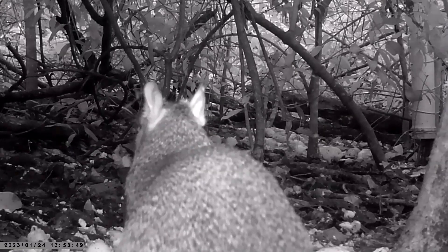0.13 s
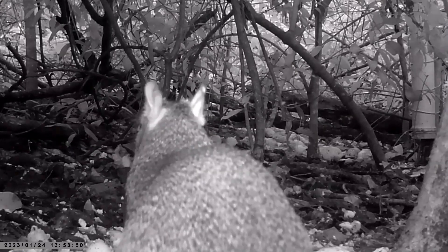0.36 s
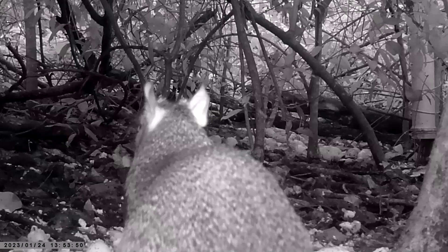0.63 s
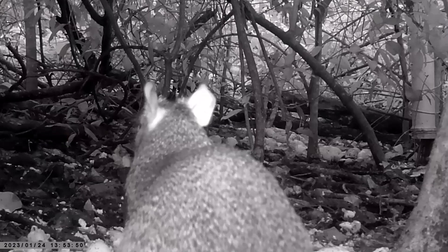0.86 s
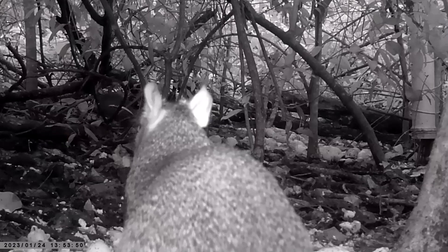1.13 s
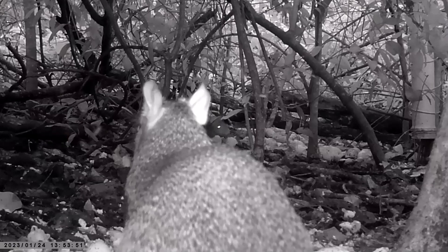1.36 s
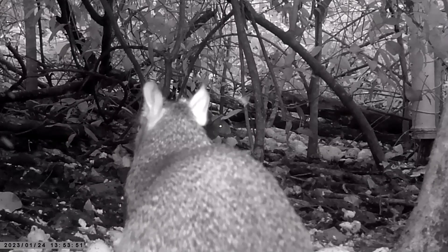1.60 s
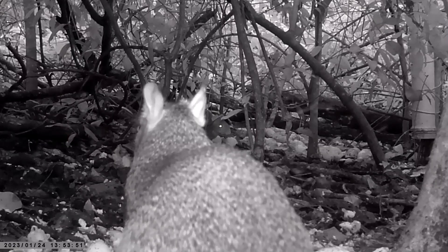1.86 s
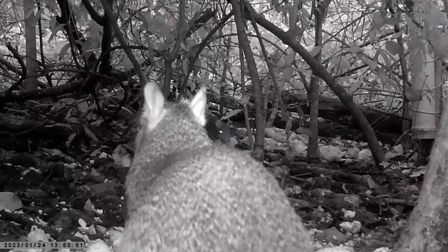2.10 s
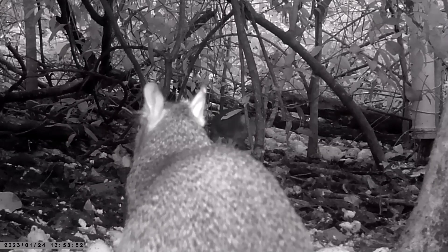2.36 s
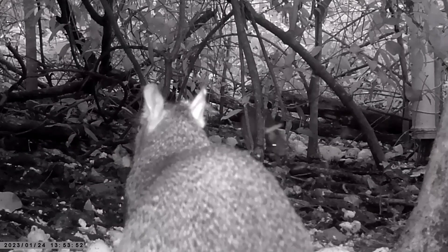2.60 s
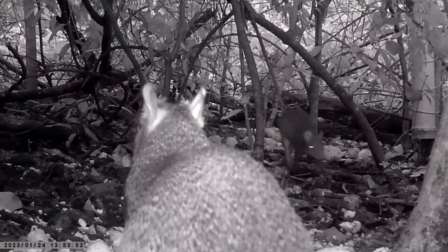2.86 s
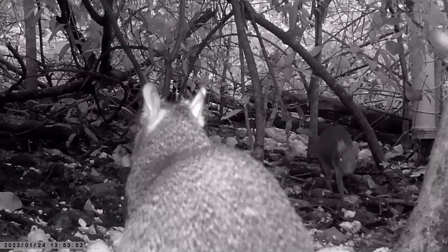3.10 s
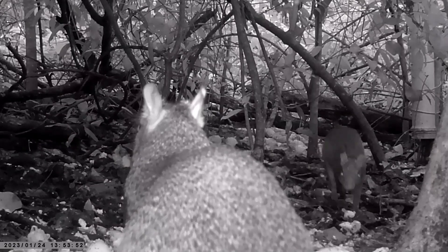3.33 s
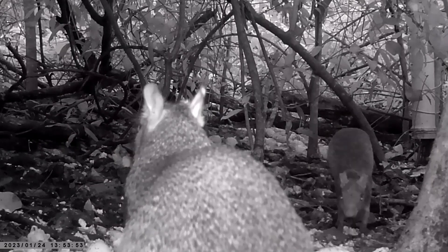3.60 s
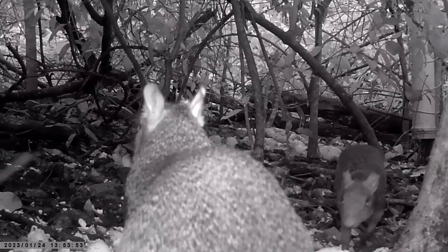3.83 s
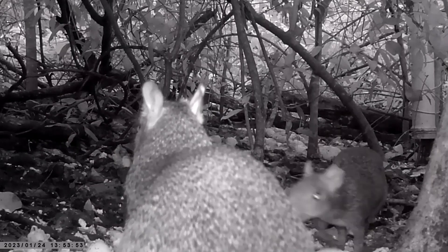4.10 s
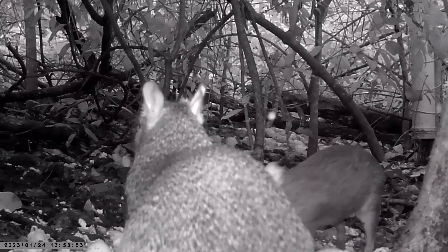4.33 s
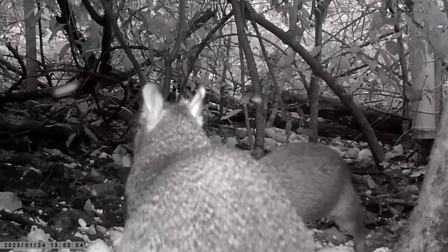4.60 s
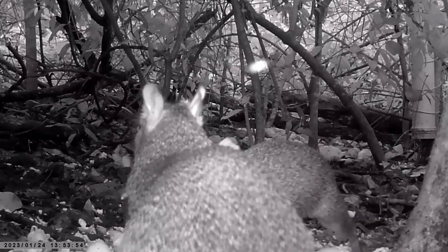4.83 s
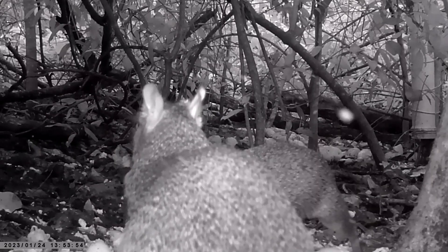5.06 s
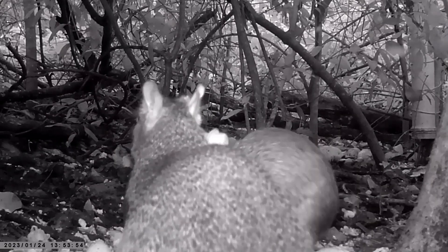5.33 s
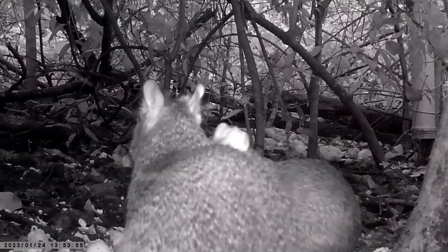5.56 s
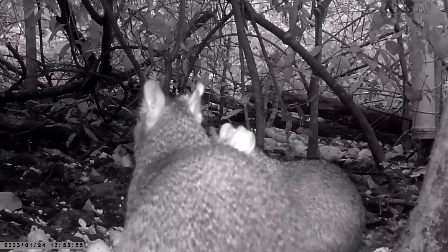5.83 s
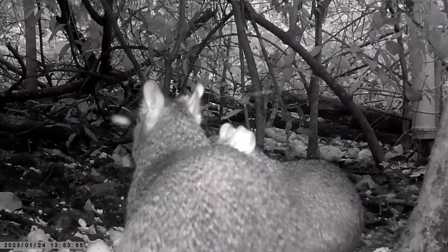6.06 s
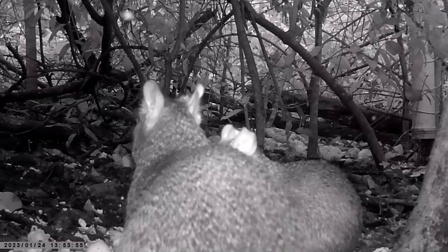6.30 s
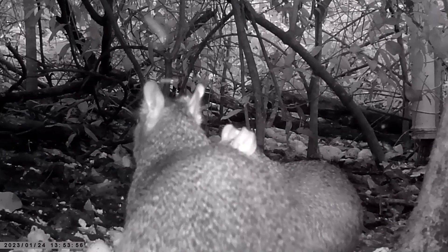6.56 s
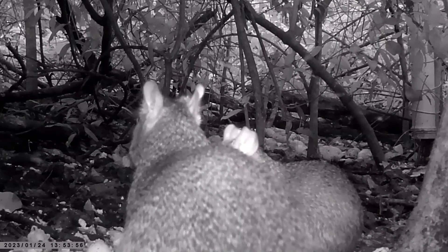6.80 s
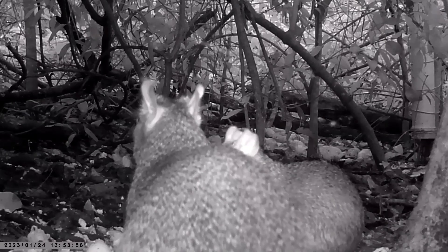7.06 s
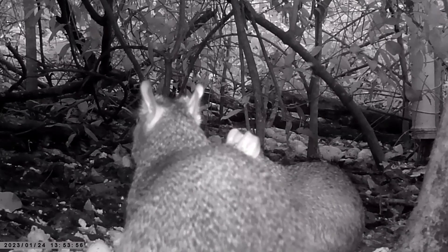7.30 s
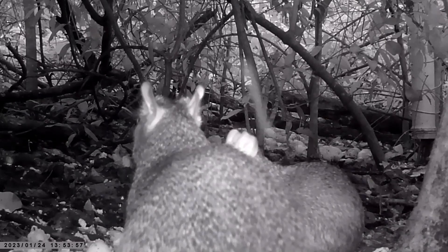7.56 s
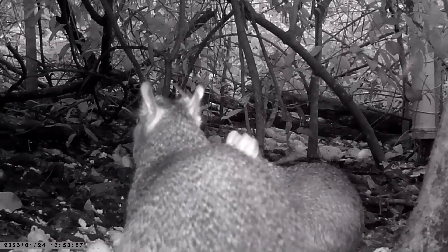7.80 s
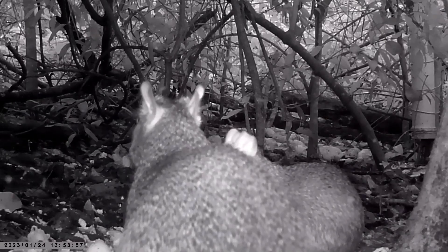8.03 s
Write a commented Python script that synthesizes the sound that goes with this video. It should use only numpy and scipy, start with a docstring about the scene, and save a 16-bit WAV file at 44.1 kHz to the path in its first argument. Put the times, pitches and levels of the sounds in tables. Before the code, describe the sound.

Daytime forest: raspy, descending bird calls repeat nearby, fainter birds hook and whistle, katydids and crickets trill, a fly hums, and leaves rustle lightly.

```python
"""A wood by day. From the start a near bird scolds with short falling calls, built of overtones and a rasp of noise;
other birds hook, whistle and slur further off, something hoots, katydids trill, and a fly hums on each pass.
From 1.3 s a cricket chirps in rows and leaves rustle; at 4.5 s a far dog barks, from 5.9 s small animals squeak.
From 6.5 s a far engine grows louder and speeds up. Noise echoes ring among the trunks; bands of noise make
the insect chorus, the rumble, a low hum, a wash of far sound and the hiss of a small microphone throughout."""
import sys
import numpy as np
from scipy import signal
from scipy.fft import rfft, irfft
from scipy.io import wavfile

SR = 44100
rng = np.random.default_rng(int(sys.argv[2]) if len(sys.argv) > 2 else 0)


def master_out(mix):
    """Clip the mix to full scale and print it as 16-bit PCM to the path in sys.argv[1]."""
    frames = np.transpose(np.atleast_2d(mix))
    ceiling = np.clip(frames, -1, 1)
    pcm = np.round(ceiling * 32767).astype(np.int16)
    wavfile.write(sys.argv[1], SR, pcm)


def to_linear_factor(level_db):
    """Convert decibel levels (scalar or array-like) to linear amplitude factors."""
    exponent = np.asarray(level_db, float) / 20
    return 10 ** exponent


N = 360297   # samples in the scene


def rms_one(x):
    """Scale to an average strength (rms) of 1."""
    return x / np.sqrt(np.mean(x ** 2) + 1e-20)


def in_time(rows):
    """Turn the columns of a table into smooth curves over all samples."""
    s, *columns = np.transpose(rows)
    return [np.interp(np.arange(N) / SR, s, column) for column in columns]


def at_hz(points, hz, order=1):
    """Read one column of a table at any frequency, on a log-frequency axis."""
    points = np.array(points)
    return np.interp(np.log(hz), np.log(points[:, 0]), points[:, order])


def drift(rate):
    """Slow random wandering of rms 1: noise smoothed below about rate in Hz."""
    r = np.exp(-2 * np.pi * rate / SR)
    smooth = signal.lfilter([1], [1, -2 * r, r * r], rng.standard_normal(N + SR))
    return rms_one(smooth[SR:])   # the first second lets the filter settle


def coloured(spectrum, low_hz=0, high_hz=SR):
    """Noise of a given spectrum, silent outside it or outside the two edges; rms 1."""
    hz = np.arange(N // 2 + 1) * SR / N + 1e-3
    inside = (hz > max(spectrum[0][0], low_hz)) & (hz < min(spectrum[-1][0], high_hz))
    noise = rfft(rng.standard_normal(N))
    return rms_one(irfft(noise * to_linear_factor(at_hz(spectrum, hz)) * inside, N))


def resonance(x, hz, width_hz):
    """Something that rings at one pitch: a two-pole band with gain 1 on top."""
    r = np.exp(-np.pi * width_hz / SR)
    feedback = [1, -2 * r * np.cos(2 * np.pi * hz / SR), r * r]
    return signal.lfilter(np.array([1, 0, -1]) * (1 - r * r) / 2, feedback, x)


def shaped(shape, s, level_db, first_s, second_s, top_hz, low_hz):
    """One note: a shape stretched over two parts and between two pitches; rows (s, Hz, dB)."""
    progress, height, shape_db = np.transpose(shape)
    times = s + np.interp(progress, [0, 1, 2], [0, first_s, first_s + second_s])
    return np.transpose([times, low_hz + height * (top_hz - low_hz), level_db + shape_db])


def swells(rows, sag):
    """Plain notes whose pitch rises and sinks; sag is the share of the top pitch that they span."""
    # shape of a plain note: (progress [0-2], height [0-1], relative level [dB])
    swell = [(0, 0, -2), (.6, 0.77, 0), (1.3, 1, 0.5), (2, .1, 5)]
    return [shaped(swell, s, db, length / 2, length / 2, top, top * (1 - sag)) for s, db, length, top in rows]


def voice(notes, throat, waver, flutter_db, count, tilt_db=0):
    """Notes as stacks of overtones weighted by the throat; pitch and level tremble."""
    out = np.zeros(N + SR)   # starts one second early, so that a call under way has its echoes
    shake, flutter = drift(200), drift(160)
    for note in notes:
        s, pitch_hz, level_db = np.transpose(note)
        at = np.arange(round(s[0] * SR), min(round(s[-1] * SR), N))
        hz = np.interp(at / SR, s, pitch_hz)
        trembling_hz = hz * (1 + waver * (hz / hz.max()) ** 2 * shake[at])   # least steady at the top
        phase = 2 * np.pi * np.cumsum(trembling_hz) / SR
        stack = 0
        for k in range(1, count + 1):
            overtone_db = at_hz(throat, k * hz) - tilt_db * max(k - 2, 0)   # the tilt starts above the second
            stack = stack + to_linear_factor(overtone_db) * np.sin(k * phase)
        level = to_linear_factor(np.interp(at / SR, s, level_db) + flutter_db * flutter[at])
        out[at + SR] += stack * level * signal.windows.tukey(len(at), .14)   # soft ends
    return out


def puff(out, s, level_db, hz, length_s, width, rise_s):
    """Add a short burst of noise round a centre pitch, with a quick rise and a fading end."""
    at = np.arange(round(s * SR), round((s + 3 * length_s) * SR))
    t = (at - at[0]) / SR
    band = signal.butter(2, [hz / width, min(hz * width, .45 * SR)], "band", fs=SR)
    noise = rms_one(signal.lfilter(*band, rng.standard_normal(len(at))))
    burst = noise * np.minimum(t / rise_s, 1) * np.exp(-t / length_s)
    return out + np.bincount(at + SR, burst * to_linear_factor(level_db), len(out))


def wood(x, direct_db, echo_db, build_s):
    """Scatter from trunks and leaves: a noisy tail that builds up, then dies band by band."""
    # echoes of the wood; long waves pass round the trunks:
    # (frequency [Hz], time to die by 60 dB [s], relative strength [dB])
    scatter = [(1000, 0.57, -15), (2000, 0.33, -0.5), (2770, 0.45, -.5), (4270, 0.41, 3), (7150, 0.46, 0.5),
               (12300, 0.83, -2)]
    t, tail = np.arange(SR) / SR, 0
    edges = 500 * 2 ** np.arange(0, 5.1, .5)   # half-octave bands
    for low, high in zip(edges, edges[1:]):
        sos = signal.butter(2, [low, high], "band", fs=SR, output="sos")
        band = signal.sosfilt(sos, rng.standard_normal(SR))
        centre_hz = np.sqrt(low * high)
        tail = tail + band * to_linear_factor(at_hz(scatter, centre_hz, order=2) - 60 * t / at_hz(scatter, centre_hz))
    tail = tail * (1 - np.exp(-t / build_s))
    echoes = signal.fftconvolve(x, tail / np.sqrt(np.sum(tail ** 2)))[:len(x)]
    return (to_linear_factor(direct_db) * x + to_linear_factor(echo_db) * echoes)[SR:]   # drop the early second


def scolding_bird():
    """Hoarse calls of one shape, held then falling; the beak rasps open just before each."""
    # calls: (time [s], base level [dB], held part [s], falling part [s], upper pitch [Hz], lead of the rasp [s])
    scolds = [(-.035, -27.5, 0.047, 0.05, 2130, 0.026), (0.297, -27, 0.046, 0.051, 2326, 0.03),
              (.637, -26.5, .056, 0.042, 2285, 0.03), (1.056, -27, 0.052, .06, 2330, 0.021),
              (1.527, -26.5, 0.046, 0.049, 2327, 0.018), (1.889, -27.5, 0.043, 0.054, 2275, .025),
              (2.223, -28.5, 0.041, 0.043, 2191, .023), (2.569, -28.5, 0.045, 0.039, 2208, 0.03),
              (2.866, -28, 0.05, 0.041, 2273, .022), (3.171, -28, 0.046, 0.052, 2312, 0.025),
              (3.513, -28.5, .045, .045, 2125, 0.021), (3.86, -26.5, 0.035, .045, 2310, 0.038),
              (5.152, -27.5, 0.028, 0.051, 2384, .035), (5.541, -27, .036, 0.04, 2195, 0.034),
              (6.836, -30.5, 0.039, 0.046, 2296, 0.032), (7.271, -28.5, 0.036, 0.058, 2300, 0.037)]
    # shape of a call: (progress [0-1 held, 1-2 falling], height from end to upper pitch [0-1], relative level [dB])
    scold_shape = [(0, 0.768, 17), (.12, .82, -9.5), (.35, 0.96, -1), (0.598, .74, -1.5),
                   (1.001, .62, -7.5), (1.35, .28, -2), (1.601, .2, -5.5), (1.88, 0.043, -8.5), (2, 0, 19)]
    # what throat and beak pass of each overtone: (frequency [Hz], level [dB])
    throat = [(1100, -22), (1500, -15.5), (2200, -15), (2600, -10.5), (2950, -3.5), (3300, -4), (4000, 1.5),
              (4600, -0.5), (5000, -9), (5700, -2.5), (6500, -16.5), (7600, -5.5), (8600, -22.5),
              (12000, -19)]
    end_hz, rasp_db = 1232.5, -17   # the rasp is relative to the call's base level
    notes = [shaped(scold_shape, s, db, held, fall, top, end_hz) for s, db, held, fall, top, lead in scolds]
    out = voice(notes, throat, waver=.046, flutter_db=3.5, count=9, tilt_db=5)
    for s, db, *_, lead in scolds:
        out = puff(out, s - lead, db + rasp_db, 3200, .011, width=1.45, rise_s=.003)
    return wood(out, direct_db=-1.5, echo_db=0, build_s=.005)


def hooking_bird():
    """Hooked calls of a second bird: a quick rise in pitch, then a long fall."""
    # calls: (time [s], base level [dB], rising part [s], falling part [s], top pitch [Hz], end pitch [Hz])
    hooks = [(0.109, -40, 0.019, 0.12, 1916, 1208), (3.259, -38, .04, 0.1, 2068, 1823),
             (3.61, -37.5, 0.019, 0.095, 1922, 1215), (7.022, -41, .07, .08, 2007, 1760),
             (7.394, -41, 0.014, 0.099, 2000, 1152)]
    # the fall after the rise: (progress [1-2], height from end to top pitch [0-1], relative level [dB])
    fall_shape = [(1, 1, 0), (1.3, .82, -9.5), (1.7, .38, -11.5), (2, 0, -13)]
    # what the throat passes: (frequency [Hz], level [dB])
    throat = [(1100, -7), (1500, -2.5), (1900, -7.5), (2500, 8.5), (3000, 12), (3800, 4), (4500, 0),
              (5800, -14), (8000, -18.5)]
    start_share = .9   # a hook sets in at this share of its top pitch
    notes = []
    for s, db, rise, fall, top, end in hooks:
        start = (s, top * start_share, db - 4)
        notes.append(np.vstack([start, shaped(fall_shape, s, db, rise, fall, top, end)]))
    calls = voice(notes, throat, waver=.018, flutter_db=2.5, count=4)
    return wood(calls, direct_db=-4, echo_db=0, build_s=.006)


def whistling_bird():
    """Arched whistles of a third bird: the pitch rises, holds and bends down."""
    # whistles: (time [s], base level [dB], rising part [s], falling part [s], top pitch [Hz])
    arches = [(.28, -54.5, .1, 0.24, 1597), (3.791, -56, 0.13, 0.19, 1641), (7.571, -55, .17, .16, 1670)]
    # shape of an arch: (progress [0-2], height from lower to top pitch [0-1], relative level [dB])
    arch_shape = [(0, 0.02, -16), (.35, .55, -1), (.75, 1, -1.5), (1, 0.99, -1.5), (1.5, 0.98, 0),
                  (1.75, .86, -4), (2, .5, -2)]
    # what the throat passes: (frequency [Hz], level [dB])
    throat = [(1000, -12), (1650, 2), (3200, 11.5), (5000, -6), (6600, -8), (8300, -4.5), (9000, -38)]
    low_hz = 1070
    notes = [shaped(arch_shape, *row, low_hz) for row in arches]
    whistles = voice(notes, throat, waver=.005, flutter_db=2.5, count=5)
    return wood(whistles, direct_db=-4, echo_db=0, build_s=.006)


def slurring_bird():
    """Falling slurs of a far bird: more of each call comes as echo."""
    # slurs: (time [s], base level [dB], length [s], top pitch [Hz])
    slurs = [(0.923, -64.5, 0.15, 2790), (4.096, -62, 0.13, 2640), (4.362, -65, 0.18, 2740),
             (4.669, -66, 0.17, 2735), (4.998, -67.5, .16, 2740), (7.703, -61, 0.16, 2610),
             (7.958, -60.5, .18, 2774)]
    # shape of a slur: (progress [0-2], height from end to top pitch [0-1], relative level [dB])
    slur_shape = [(0, 1, -7), (.55, .68, -5), (1.4, .12, 0), (2, 0, -10)]
    # what the throat passes: (frequency [Hz], level [dB])
    throat = [(1800, 10.5), (3000, 15.5), (4000, -11), (6000, 1)]
    end_hz = 1890
    notes = [shaped(slur_shape, s, db, length / 2, length / 2, top, end_hz) for s, db, length, top in slurs]
    calls = voice(notes, throat, waver=.025, flutter_db=2.5, count=2)
    return wood(calls, direct_db=-9, echo_db=0, build_s=.006)


def katydids():
    """Each wing stroke scrapes a narrow resonance for part of the cycle."""
    # bouts of song: (time [s], length [s], level before the slow wavering [dB], pitch [Hz])
    bouts = [(.08, 1.14, -55, 6330), (1.3, .7, -61.5, 6360), (2.18, 0.67, -54, 6330),
             (3.212, 0.29, -54.5, 6310), (4.0, 0.67, -55, 6306), (6.821, 0.765, -53, 6360),
             (7.592, 0.41, -62, 6340), (7.933, 0.37, -58, 6345)]
    fade_s, strokes_per_s = 0.035, 55.6
    t, out = np.arange(N) / SR, 0
    cycle = np.cumsum(strokes_per_s * (1 + 0.025 * drift(8))) / SR
    strokes = .6 + np.clip(np.sin(2 * np.pi * cycle), 0, 1)
    wander, white = .9 * drift(25), rng.standard_normal(N)
    for s, length, level_db, hz in bouts:
        bout = np.clip(np.minimum(t - s, s + length - t) / fade_s, 0, 1)
        tone = np.sin(2 * np.pi * hz * t + wander)
        scrape = .28 * rms_one(resonance(white, hz, 100))
        out = out + to_linear_factor(level_db) * bout * rms_one(strokes * (tone + scrape))
    return out * to_linear_factor(1.5 * drift(6))


def cricket():
    """Rows of pure chirps at an even pace, blurred by the echoes."""
    # rows of chirps: (time of the first [s], number of chirps, base level [dB])
    rows = [(1.32, 3, -57.5), (2.39, 3, -56), (4.04, 4, -59), (4.806, 5, -59.5), (5.69, 4, -60),
            (6.548, 5, -57.5), (7.83, 5, -53.5)]
    pitch_hz, gap_s, chirp_s = 4752, .0737, .042   # the gap runs from start to start
    t, gate = np.arange(-SR, N) / SR, 0
    for s, chirps, level_db in rows:
        for k in range(round(chirps)):
            progress = np.clip((t - s - k * gap_s) / chirp_s, 0, 1)
            gate = gate + to_linear_factor(level_db + rng.normal(0, 0.67)) * np.sin(np.pi * progress) ** 0.73
    return wood(gate * np.sin(2 * np.pi * pitch_hz * t), direct_db=-.5, echo_db=-10, build_s=.005)


def small_animals():
    """They squeak in short stacks of overtones, close by and with little echo."""
    # squeaks: (time [s], base level [dB], length [s], top pitch [Hz])
    squeaks = [(5.938, -58.5, 0.014, 1000), (6.103, -60.5, 0.039, 861), (6.305, -62.5, 0.015, 880)]
    # what the throat passes: (frequency [Hz], level [dB])
    throat = [(850, -6), (1700, -2), (2600, 1), (3500, -1), (5000, -7), (7000, -13)]
    out = voice(swells(squeaks, sag=.05), throat, waver=.015, flutter_db=2, count=7)
    return wood(out, direct_db=0, echo_db=-9, build_s=.004)


def rustling_leaves():
    """Dry leaves crack and slide under the animals: short bursts of noise."""
    # rustles: (time [s], level before rise and fade [dB], centre [Hz], fading time [s])
    rustles = [(1.318, -46, 5000, .03), (4.335, -54, 8000, .03), (4.42, -56, 5000, .015),
               (4.509, -46, 5000, .006), (4.47, -58, 2200, .04), (4.54, -58, 1800, .03),
               (4.70, -58, 5000, .02), (5.80, -59, 2500, .02), (5.95, -57, 4500, .01),
               (6.094, -45, 8500, .003), (6.138, -54, 1200, .01), (6.142, -57, 5000, .01),
               (6.24, -60, 2800, .01), (6.315, -58, 3000, .015), (7.62, -57, 5000, .008)]
    out = np.zeros(N + SR)
    for s, level_db, hz, length_s in rustles:
        out = puff(out, s, level_db, hz, length_s, width=1.6, rise_s=.0007)
    return wood(out, direct_db=0, echo_db=-9, build_s=.004)


def fly():
    """A wavering wingbeat as a pure tone, swelling and fading on each pass."""
    # passes: (time when nearest [s], time to fade on either side [s], level [dB], wingbeat when nearest [Hz])
    passes = [(.15, 0.09, -70, 191.5), (1.07, .3, -54.5, 197.3), (2.0, 0.23, -56.5, 195),
              (3.02, 0.047, -56.5, 195), (3.25, 0.056, -64, 194.7), (4.3, 0.15, -58, 201.4),
              (5.331, 0.21, -58.5, 198)]
    sag_hz_per_s = 14   # the beat drops as it passes
    t, out, waver = np.arange(N) / SR, 0, 1 + 0.0055 * drift(9.0)
    for s, width_s, level_db, hz in passes:
        beat_hz = (hz - sag_hz_per_s * np.clip(t - s, -1, 1)) * waver
        nearness = np.exp(-np.abs(t - s) / width_s)
        out = out + to_linear_factor(level_db) * nearness * np.sin(2 * np.pi * np.cumsum(beat_hz) / SR)
    return np.sqrt(2) * out   # a sine of rms 1


def far_dog():
    """Barks as rich stacks of overtones with a small bend in pitch."""
    # barks: (time [s], base level [dB], length [s], top pitch [Hz])
    barks = [(4.45, -64.5, .14, 278), (4.64, -72.5, .12, 272)]
    # what the throat passes: (frequency [Hz], level [dB])
    throat = [(270, -2), (540, 8.5), (810, 2), (1080, 13), (1400, 0), (2400, 1), (3500, -17)]
    out = voice(swells(barks, sag=.09), throat, waver=.03, flutter_db=3, count=12)
    return wood(out, direct_db=-4, echo_db=0, build_s=.006)


def far_hoots():
    """Low hoots far away: single tones without overtones."""
    # hoots: (time [s], base level [dB], length [s], top pitch [Hz])
    hoots = [(.2, -62, 0.41, 527), (4.0, -60.5, 0.78, 475), (5.36, -64, .38, 917)]
    out = voice(swells(hoots, sag=.02), [(400, 0), (1000, 0)], waver=.01, flutter_db=1, count=1)
    return wood(out, direct_db=-4, echo_db=0, build_s=.006)


def chorus():
    """Many far insects blur into a few flickering bands of hiss."""
    # loudness over time: (time [s], level before a 1 dB lift [dB])
    loudness = [(0.0, -57), (.6, -58), (1.7, -62.5), (2.9, -60), (4.07, -58), (4.92, -64), (5.89, -61),
                (6.3, -64.5), (7.1, -53.5), (7.35, -54), (7.6, -63.5), (8.17, -58)]
    # bands of hiss: (centre [Hz], width of each of two filters [Hz], relative level [dB])
    bands = [(4600, 160, -10), (5100, 500, -7), (5650, 350, -2), (6000, 400, 0), (6400, 250, -5)]
    hiss = 0
    for hz, width, db in bands:
        band = resonance(resonance(rng.standard_normal(N), hz, width), hz, width)
        hiss = hiss + to_linear_factor(db + 2.2 * drift(8)) * rms_one(band)
    return to_linear_factor(in_time(loudness)[0] + 1.0) * rms_one(hiss)


def far_engine():
    """A far engine speeds up: one sine that climbs in pitch."""
    # the engine: (time [s], pitch [Hz], level before its wavering [dB])
    course = [(6.9, 42, -55), (7.35, 46.14, -53), (7.75, 59.15, -44.5), (8.17, 61.8, -59)]
    hz, level_db = in_time([(6.5, course[0][1], -90)] + course)   # fades in from 6.5 s
    return to_linear_factor(level_db + 2.0 * drift(8.7)) * np.sin(2 * np.pi * np.cumsum(hz) / SR)


def rumble():
    """Deep rumble and a middle wash of far sound: noise that swells and sinks together by chance."""
    # loudness before the swelling: (time [s], deepest level [dB], deep level [dB], middle level, 3 dB low [dB])
    loudness = [(0.0, -49, -51.5, -56.5), (1.0, -52.5, -55, -61), (1.7, -49, -54, -60.5),
                (2.5, -51.5, -53.5, -61.5), (4.0, -47.5, -56, -59.5), (5.1, -55, -57.5, -63.5),
                (5.6, -49, -55, -61), (6.2, -51.5, -60.5, -64), (6.7, -54.5, -58, -64),
                (7.3, -48, -54, -58), (7.8, -48.5, -56, -60), (8.17, -46.5, -58, -62)]
    # spectrum of the rumble: (frequency [Hz], relative level per Hz [dB])
    deep_spectrum = [(12, -30), (20, 5), (27, -11.5), (59, -2.5), (86, -5.5), (123, -8.5), (146, -16),
                     (194, -11.5), (227, -20), (250, -21.5), (320, -23.5), (550, -120)]
    # spectrum of the wash: (frequency [Hz], relative level per Hz [dB])
    middle_spectrum = [(120, -38), (200, -8.5), (323, -9.5), (476, -10), (585, -12), (657, -12.5),
                       (1710, -18.5), (2520, -17.5), (2830, -20), (4400, -23), (5720, -84), (9680, -120)]
    swells_per_s, swell_db = 5, 1.4
    deepest_db, deep_db, middle_db = in_time(loudness) + swell_db * drift(swells_per_s)
    deepest = to_linear_factor(deepest_db) * coloured(deep_spectrum, high_hz=82)
    deep = to_linear_factor(deep_db) * coloured(deep_spectrum, low_hz=82)
    middle = to_linear_factor(middle_db + 3 + .6 * drift(12)) * coloured(middle_spectrum)
    return deepest + deep + middle


def far_hum():
    """A low hum far away: noise through a resonance only 3 Hz wide."""
    return to_linear_factor(-62.5) * rms_one(resonance(rng.standard_normal(N), 123.5, 3))


def microphone_hiss():
    """The microphone's hiss pulses with its electronics: each beat jumps up and dies away."""
    # spectrum of the hiss: (frequency [Hz], relative level per Hz [dB])
    spectrum = [(4000, -26), (6800, -15), (7750, -16), (9080, -13), (13200, -14), (14900, -12.5),
                (15800, -23)]
    floor_db, beats_per_s = -65.5, 30.05
    beat = np.exp(-np.mod(np.arange(N) / SR * beats_per_s, 1) / 0.14)
    hiss = coloured([(4300, -5.5)] + spectrum)   # silent below 4300 Hz
    return to_linear_factor(floor_db + 5.0 * beat + 0.33 * drift(42)) * hiss


def scene():
    """All sources at one microphone."""
    birds = scolding_bird() + hooking_bird() + whistling_bird() + slurring_bird()
    insects = katydids() + cricket() + chorus() + fly()
    animals = small_animals() + rustling_leaves() + far_dog() + far_hoots()
    background = far_engine() + rumble() + far_hum() + microphone_hiss()
    return (birds + insects + animals + background)[None]


def low_pass(x):
    """Removes everything above the highest recorded frequency."""
    return signal.sosfilt(signal.butter(12, 15940, fs=SR, output="sos"), x)


def record(dry):
    """Turn the finished mix into the sound that is kept."""
    return low_pass(dry)


dry = scene()
out = record(dry)
master_out(out)
```